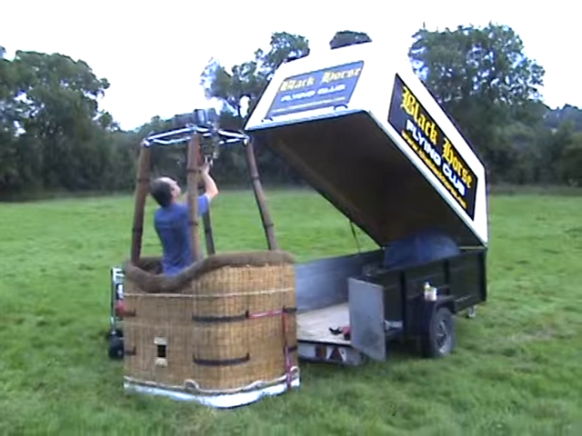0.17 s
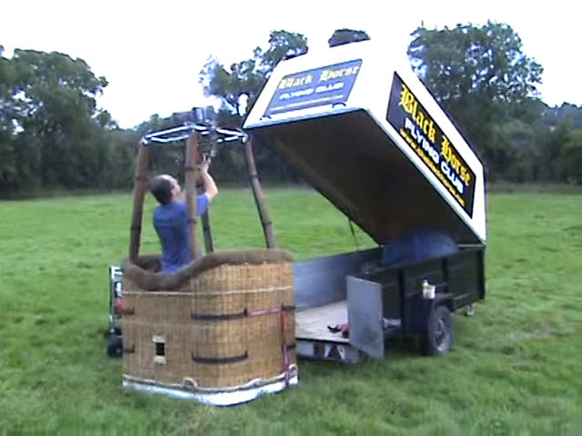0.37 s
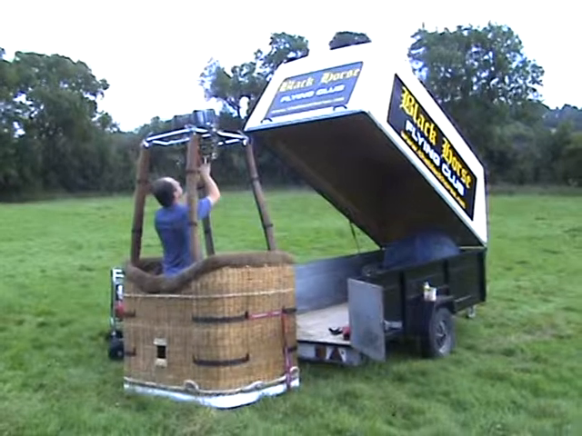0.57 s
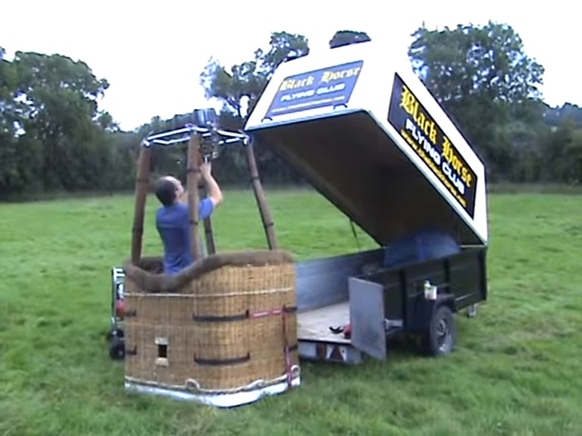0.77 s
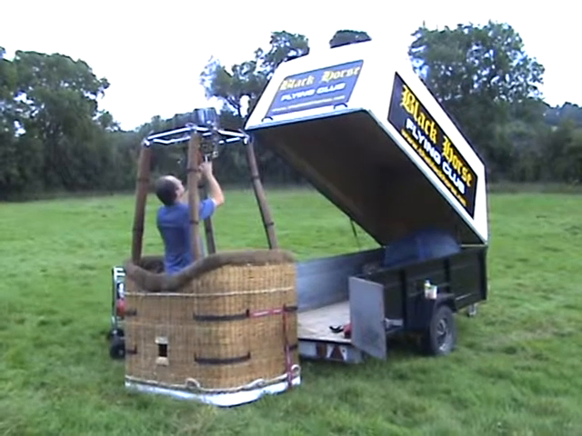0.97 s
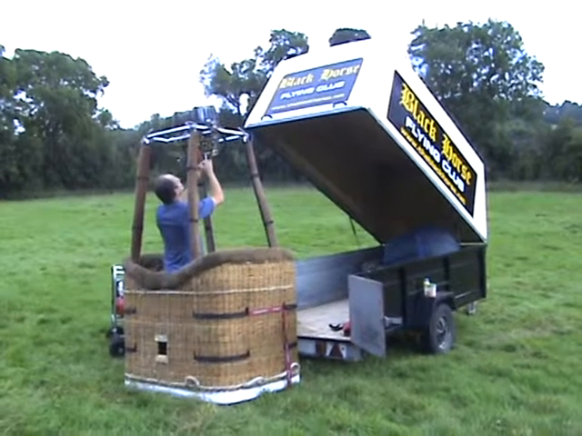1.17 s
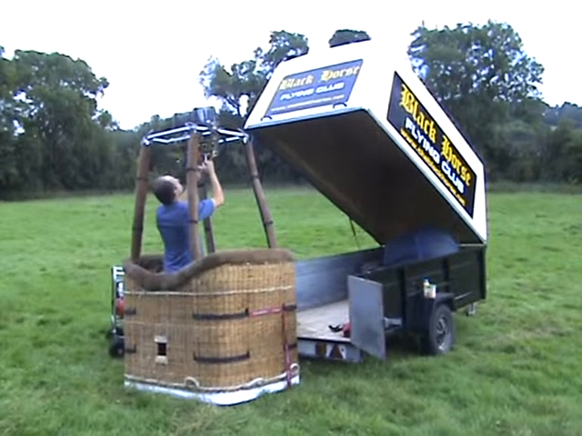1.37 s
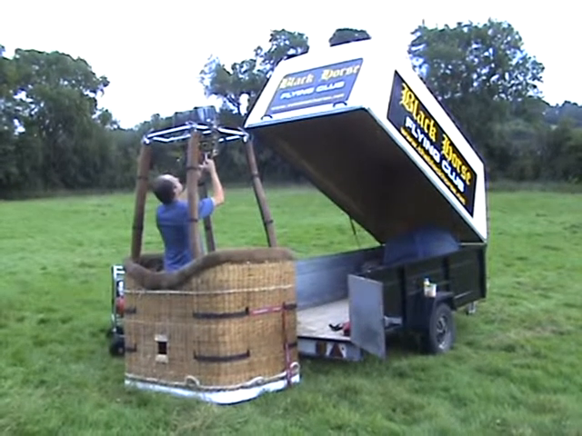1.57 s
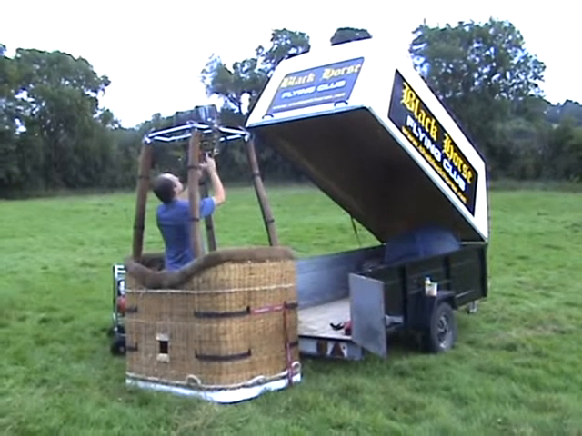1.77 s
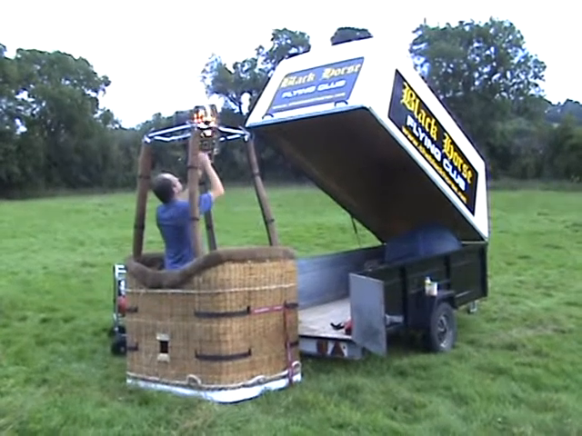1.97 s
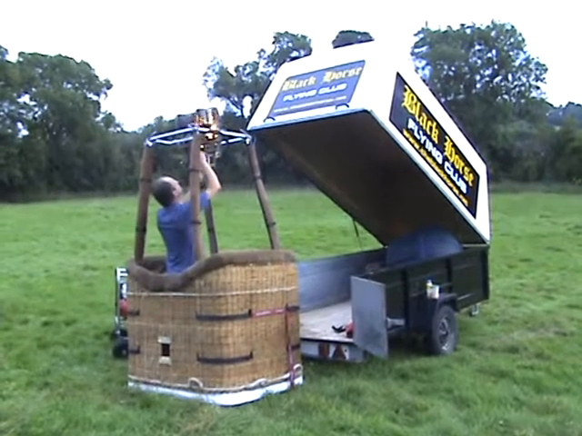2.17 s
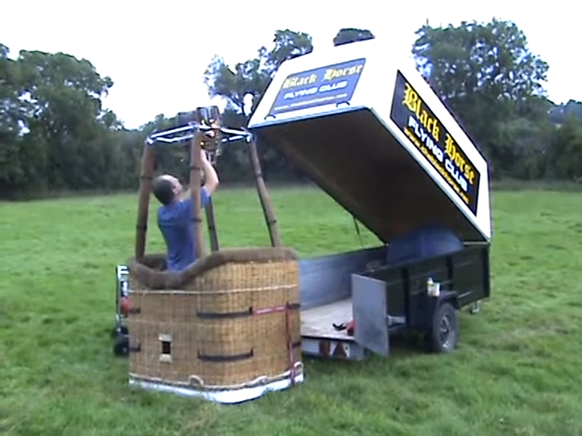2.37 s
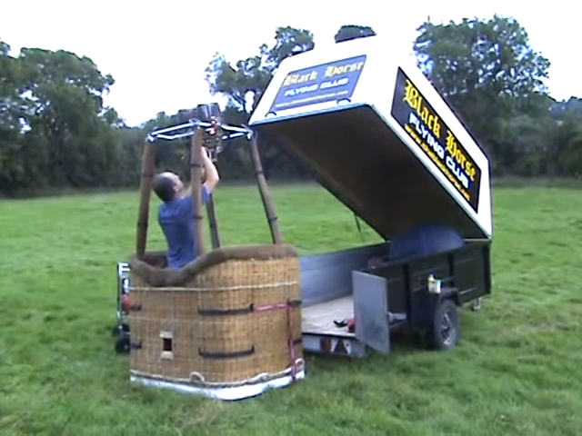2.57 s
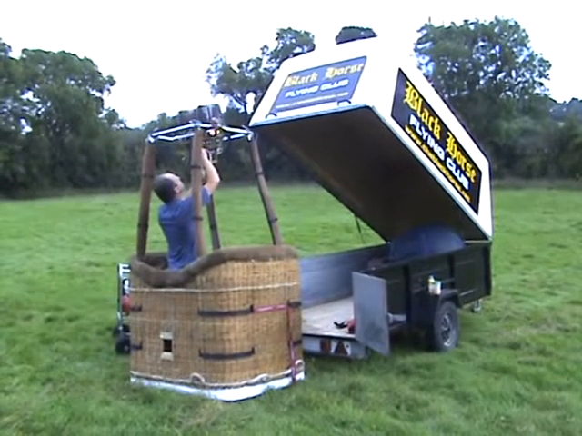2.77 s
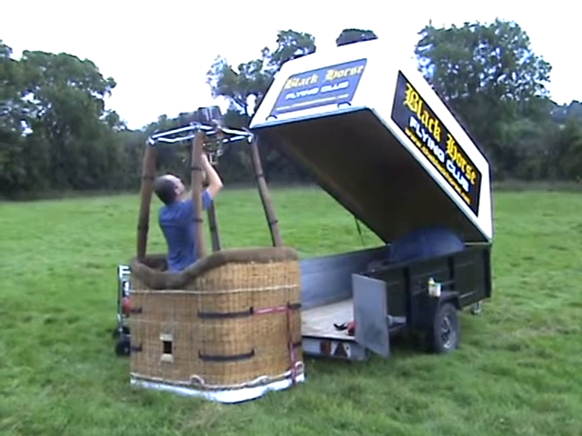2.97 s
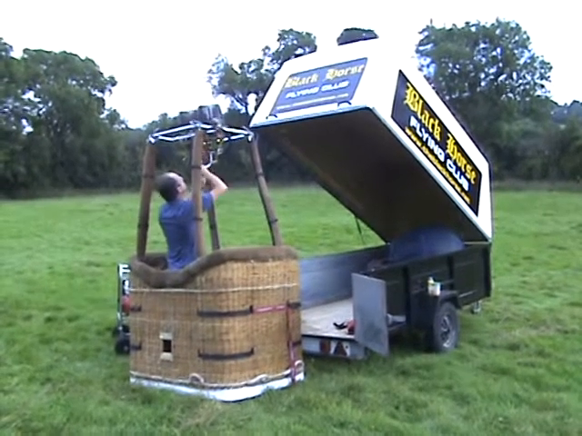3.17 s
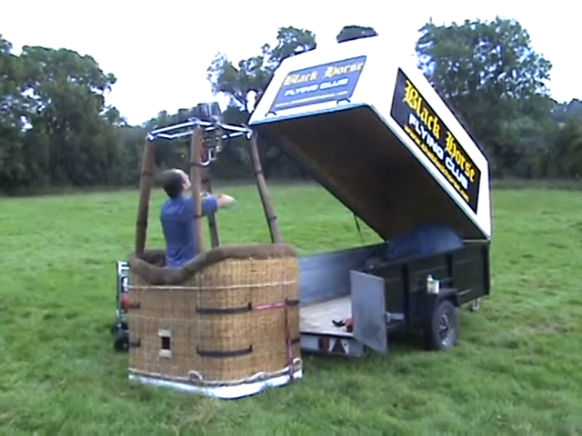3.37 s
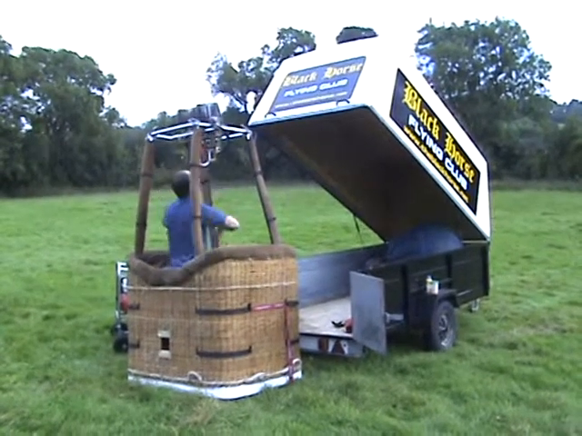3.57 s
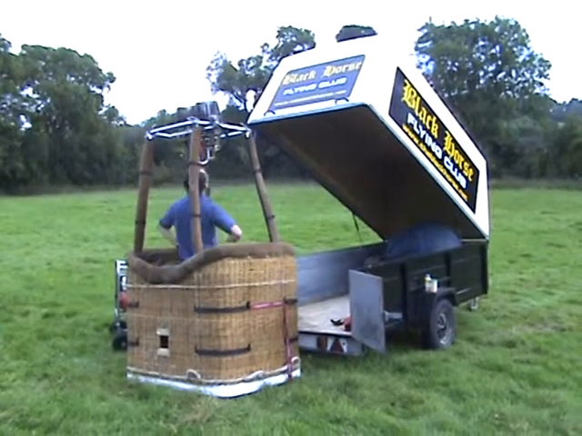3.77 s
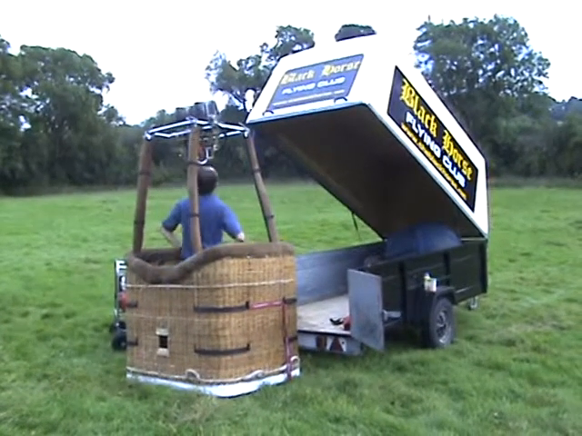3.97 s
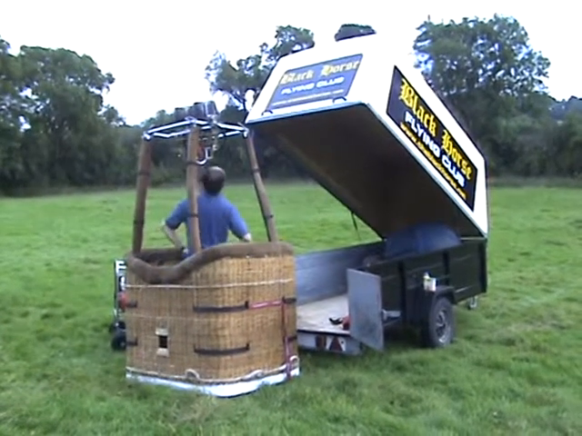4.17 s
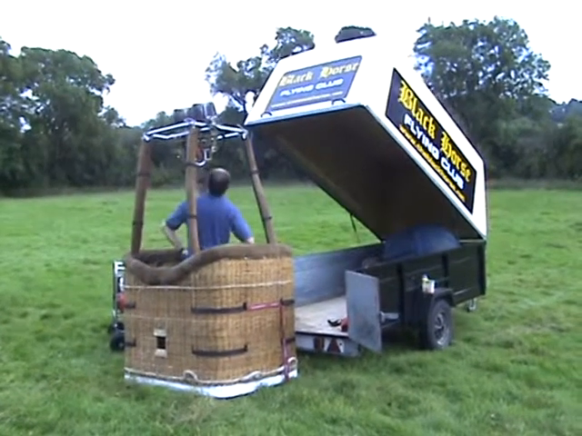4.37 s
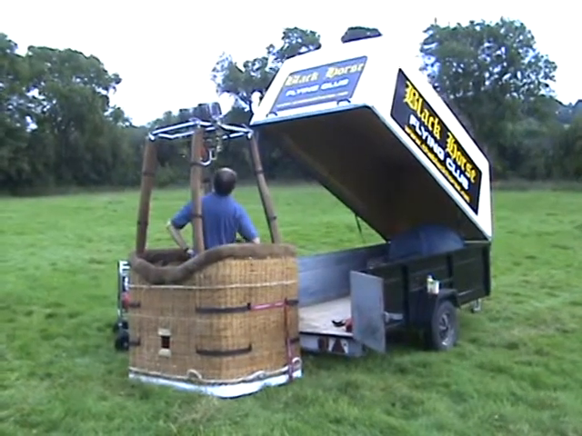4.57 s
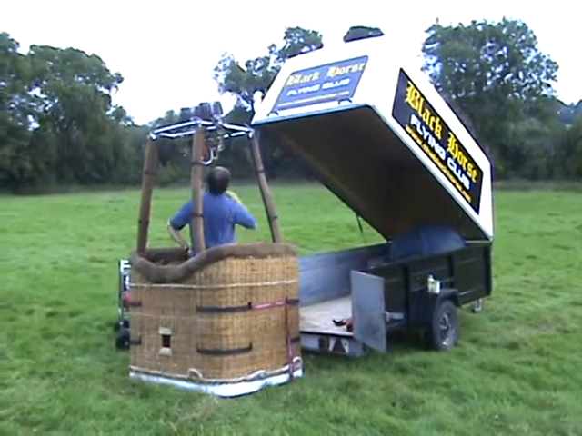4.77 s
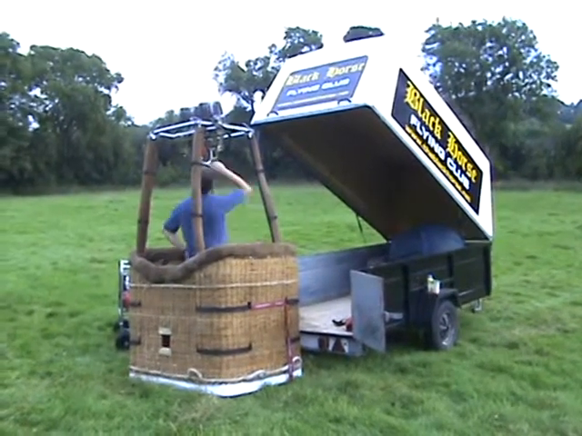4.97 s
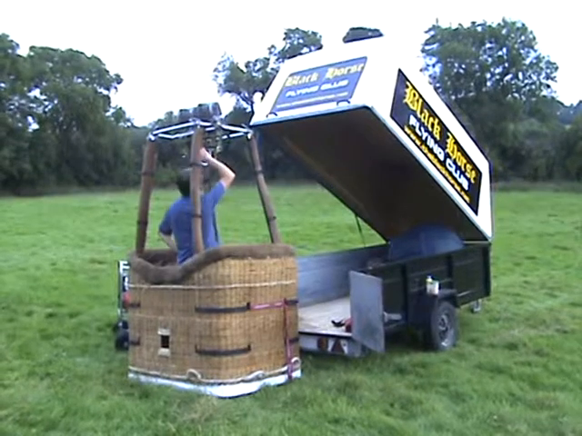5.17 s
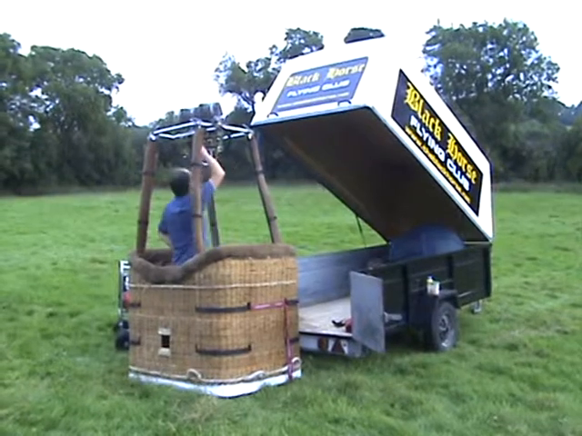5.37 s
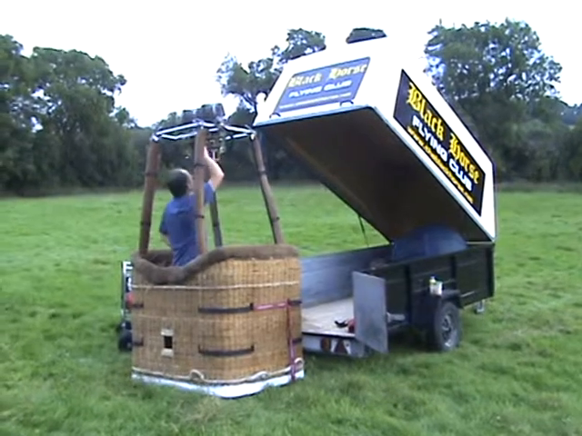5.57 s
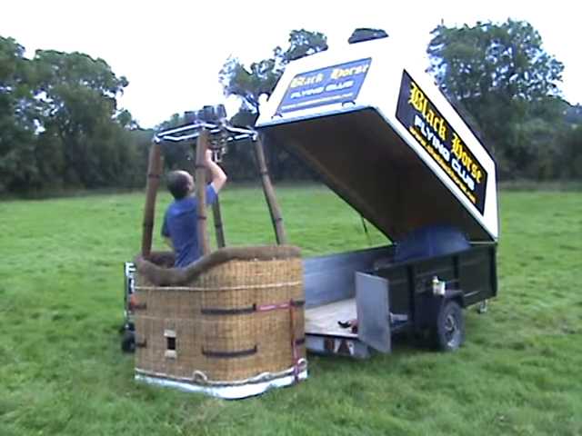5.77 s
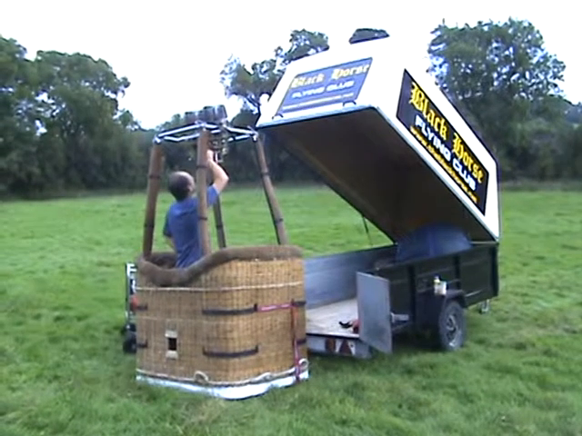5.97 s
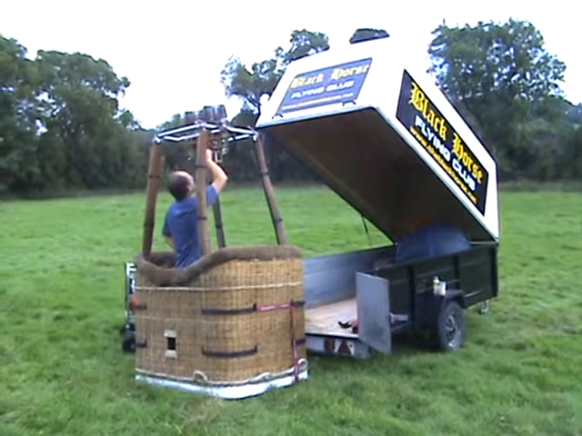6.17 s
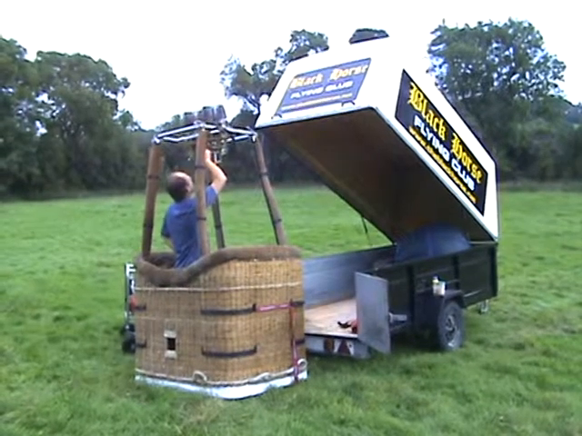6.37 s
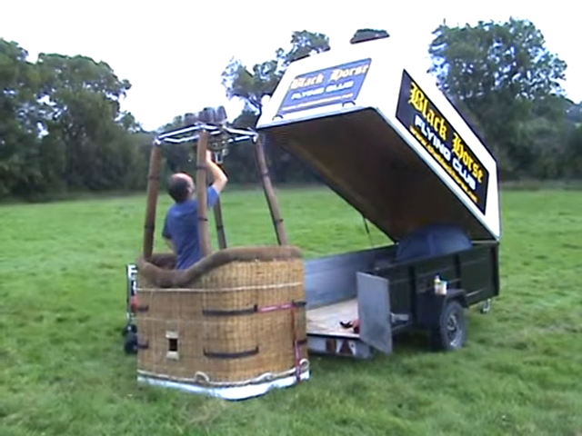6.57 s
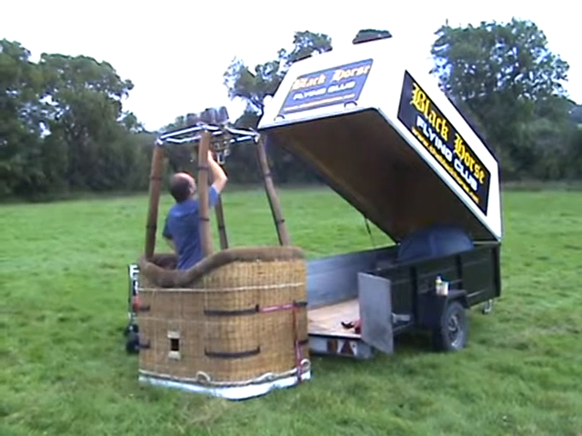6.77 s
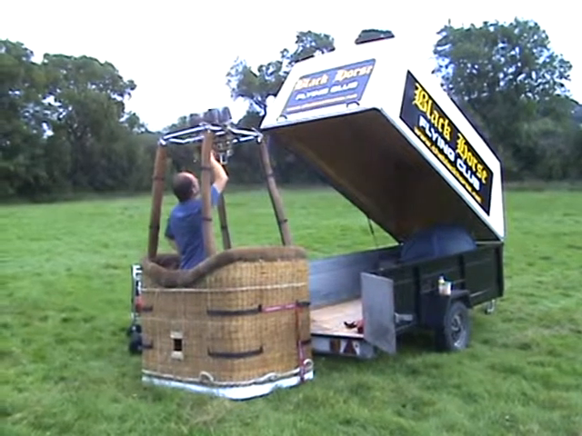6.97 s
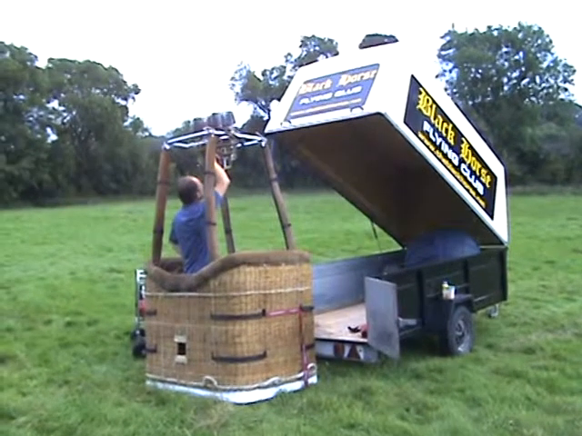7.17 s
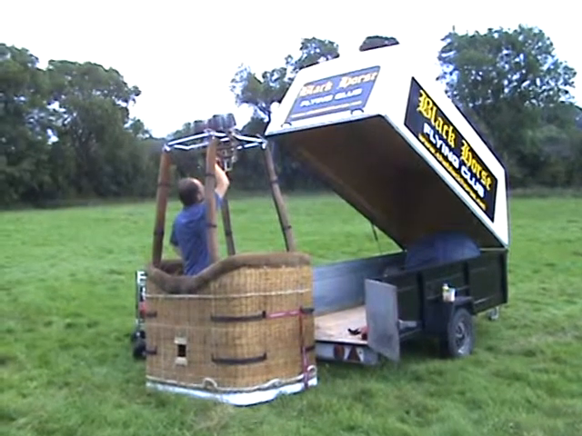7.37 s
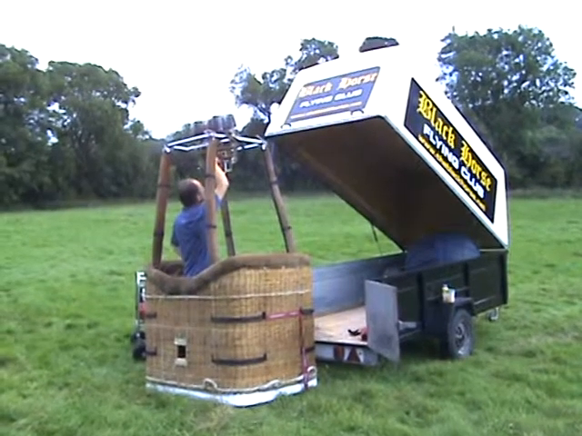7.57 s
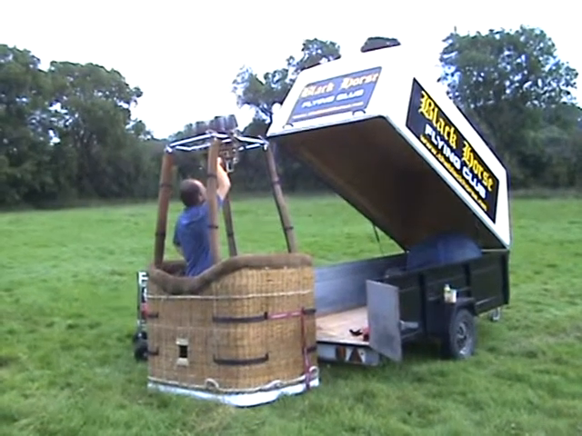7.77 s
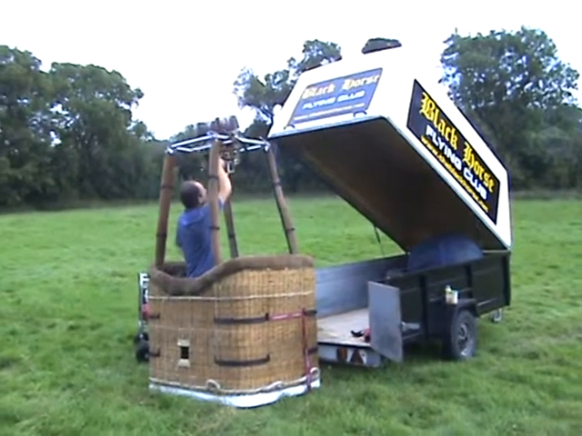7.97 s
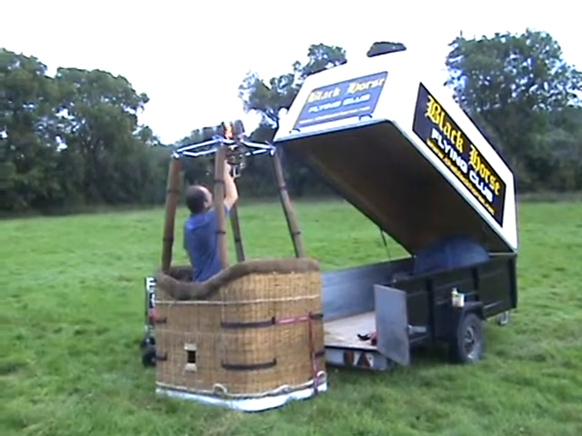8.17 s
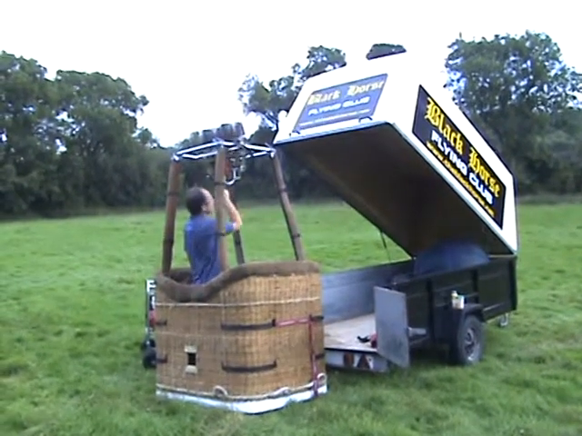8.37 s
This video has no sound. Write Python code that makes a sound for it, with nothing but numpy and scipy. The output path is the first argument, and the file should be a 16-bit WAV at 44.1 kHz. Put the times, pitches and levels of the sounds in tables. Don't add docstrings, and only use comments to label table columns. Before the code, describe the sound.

From a very quick fade-in at 0 s, a balloon burner blasts at full force: a dense low roar, a midrange rush of gas and a bright, sharp hiss with sizzle, nearly overloading the camera microphone. It weakens from about 1.6 s and is cut by 1.9 s. The pause is far quieter: distant traffic rumble and wash, a far car's soft tyre note sinking in pitch, and a thin whistling pilot hiss. A crisp metal tick comes at 3.76 s, with fainter ones near 4.3, 5.6 and 5.83 s. At about 5.97 s gas spits, then catches with a low thump and pop and a small crack. The second blast roars until about 7.9 s, deeper and less hissy, its sizzle sputtering in surges around 6.5, 7.4 and 7.9 s. It stops abruptly near 8 s, leaving faint road noise until 8.4 s. Open field, wide stereo, dry.

```python
import sys
import numpy as np
from scipy import signal
from scipy.fft import rfft, irfft, next_fast_len
from scipy.io import wavfile
from scipy.ndimage import uniform_filter1d

SR = 44100
rng = np.random.default_rng(int(sys.argv[2]) if len(sys.argv) > 2 else 0)


def waveform_to_disk(signal):
    frames = np.transpose(np.atleast_2d(signal))
    scaled = np.clip(frames, -1, 1) * 32767
    samples = np.round(scaled).astype(np.int16)
    wavfile.write(sys.argv[1], SR, samples)


def elevation(decibels):
    levels = np.asarray(decibels, float)
    return 10 ** (levels / 20)


N = 370881

# (time [s], flow [dB])
VALVE_FLOWS = [
    [(0.03, -39), (0.05, -2), (0.07, 0), (0.55, 0.5), (1.41, -1.5), (1.62, -6), (1.74, -12.5), (1.85, -33), (1.95, -52)],
    [(5.965, -40.5), (5.995, -21), (6.02, -7.5), (6.04, -5), (6.1, 0.5), (7.945, -0.5), (7.982, -15), (8.02, -27), (8.14, -35)],
]
# (catches [s], starves [s], roar [dB], dies [dB per s], cold start [dB])
FLAMES = [
    (0.04, 1.738, -11.5, 158, -0.6),
    (6.034, 7.91, -16.5, 191, -1.5),
]
# (rush [dB], hiss [dB], sizzle [dB])
JET_LEVELS = [(-20, -25, -31.5), (-25, -37.5, -44.5)]
# (rush [dB per dB], hiss [dB per dB], sizzle [dB per dB])
JET_FOLLOW = [(.62, 1.07, 1.15), (1.2, .95, 0.85)]
# (frequency [Hz], level [dB per Hz])
FLAME_COLOURS = [
    [(15, -53), (25, -30.5), (58, -8.5), (128, -14), (195, -3.5), (273, -1.5), (319, -3), (390, -20), (455, -10), (620, -6), (757, -17), (870, -15), (1000, -27.5), (1300, -51), (2200, -120)],
    [(15, -39.5), (25, -8.5), (69, -4.5), (123, -6.5), (231, 1), (295, 0), (384, -14), (515, -4.5), (629, -5.5), (734, -9.5), (1000, -17.5), (1300, -46), (2200, -120)],
]
# (frequency [Hz], width [Hz], lift [dB])
GROUND_ECHO = [(121, 13, -6), (102, 32, 3.5), (691, 39, 3.5), (784, 89, -3.5)]
# (frequency [Hz], level [dB per Hz])
GAS_COLOURS = [
    [(470, -21), (800, 5), (975, -6), (1100, -0.5), (1310, -3), (2270, -8), (2560, -7), (3450, -17), (6740, -15), (11200, -20), (15500, -28)],
    [(470, -29), (800, 3), (963, -4), (1060, -1.5), (1790, -4.5), (3330, -15.5), (4320, -12.5), (6340, -10.5), (8860, -23), (11800, -25.5), (15500, -34)],
]
# (frequency [Hz], width [Hz], lift [dB])
COIL_RINGING = [
    [(1100, 64, 5.5), (1780, 180, 4), (2032, 67, 7.5), (2566, 100, 6), (2760, 90, -1), (1320, 100, -2.5), (5000, 94, 2.5), (6860, 370, 2.5), (10900, 870, 2)],
    [(1720, 130, 1), (4360, 450, 3), (6250, 110, 2.5), (8270, 120, 5), (9380, 180, 2), (12050, 350, 3), (12650, 400, -3), (10620, 293, 2.5)],
]
# (peak [s], lift [dB], builds [s], clears [s])
SPITS = [(0.126, 2, 0.026, .02), (0.36, -0.5, 0.053, .06), (6.035, 11.5, 0.026, 0.032),
         (6.095, 8, 0.032, 0.086), (6.35, 4.5, .1, 0.097), (6.53, 7.5, 0.11, 0.083), (6.93, 2, .03, .05),
         (7.4, 8.5, 0.11, 0.065), (7.56, 2.5, 0.018, .03), (7.76, 4, .06, 0.064), (7.87, 8, .025, 0.038),
         (7.96, 7, 0.039, 0.0354)]
SPIT_SHARES = (.1, .15, .45, 1.01)
# (time [s], drop [dB], length [s])
STUTTERS = [(0.159, -2, 0.012), (0.256, -2, 0.025), (6.556, -7.5, 0.02), (7.52, -1.5, 0.017)]
STUTTER_SHARES = (0.38, 0.43, .9, .6)
# (time [s], strength [dB], ring [Hz], time to fall 60 dB [s], roughness [0-1])
IGNITION = [
    (5.974, -31, 7500, 0.2, 0.8),
    (6.11, -18, 2480, .004, 0.22),
    (6.040, -4, 165, .11, .1),
    (6.038, -9, 80, .2, .1),
]
# (time [s], strength [dB], ring [Hz], time to fall 60 dB [s], roughness [0-1])
METAL_TICKS = [(3.758, -26, 4120, .012, .15), (3.7566, -25, 2100, .015, .8), (3.7567, -42, 6600, .014, .9),
               (3.7754, -43, 7000, .009, .5), (3.7756, -41, 3800, .010, .7), (4.277, -42, 2760, .05, .3),
               (5.606, -39, 2850, .08, .1), (5.975, -35, 2700, .06, .2), (5.830, -51, 6900, .07, .15),
               (5.828, -53, 8600, .05, .9), (5.842, -50, 5300, .08, .3), (5.834, -35, 2550, .06, .1),
               (5.829, -62, 11900, .03, .1), (5.852, -54, 7400, .05, .8)]
# (time [s], note [Hz], level
# [dB])
CAR = [(1.9, 1100, -42), (2.7, 1080, -44.5), (3.3, 1000, -43.5), (3.75, 1020, -37), (4.0, 920, -41),
       (4.4, 860, -39.5), (5.3, 781, -40.5), (5.9, 750, -39.5), (8.1, 1080, -40.5)]
# (time [s], nearness [dB])
ROAD_NEARNESS = [(1.95, -4), (2.7, -2.5), (3.55, -2.5), (3.76, -1), (3.98, -1.6), (4.88, 0.2), (5.9, -0.6),
                 (8.1, -1), (8.41, -0.5)]
# (frequency [Hz], level [dB per Hz])
ROAD_COLOUR = [(15, -34), (25, -12), (61, -5.5), (84, 0), (136, -7), (274, -4.5), (388, -9), (551, -4.5),
               (969, -5), (1370, -8.5), (1950, -16.5), (3340, -38), (4370, -43.5), (8110, -58.5),
               (15500, -65)]
# (time [s], lift [dB], length [s])
ENGINES = [(1.98, -5, .12), (2.75, 3.5, .3), (3.76, 2.5, .12), (4.6, -1, .3), (5.1, -3.5, .1),
           (8.3, 6, .15)]
# (frequency [Hz], width [Hz], lift [dB])
BACKGROUND_PEAKS = [(80, 17, 6), (1080, 300, 0.5), (4400, 370, 3.5), (6250, 250, 6), (5300, 40, -7),
                    (6870, 44, 8)]
# (time [s], level [dB])
PILOT_HISS = [(1.95, -64.5), (3.0, -67), (4.5, -64), (5.55, -63), (5.8, -62), (8.1, -60.5), (8.41, -61.5)]
# (frequency [Hz], level [dB])
SIDE_NOISE = [(30, -14), (150, -20), (600, -20), (1500, -15), (4000, -10), (8000, -9), (13000, -13)]
# (frequency [Hz], left minus right [dB], left leads [radians])
STEREO_PORTS = [(30, -6.2, 0.26), (60, -5.7, 0.41), (120, -3.6, 0.75), (220, -1.6, 1.1), (400, 0.5, 1.51),
                (700, 4.1, 1.7), (1200, 6.0, 2.03), (2000, 7.1, 2.52), (3000, 5.7, 3.25), (4300, 3.5, 4.06),
                (6000, 1.7, 4.83), (8000, 1.3, 5.38), (11000, 0.5, 5.96), (15000, 0.3, 6.22)]


def blast(flow, jets_db, follow, fire, flame_colour, gas_colour, coil):
    s, flow_db = np.transpose(flow)
    count = round(2.3 * SR)
    t = s[0] + np.arange(count) / SR
    flame, gas = lifted(flame_colour, GROUND_ECHO), lifted(gas_colour, coil)
    roar = turbulence(count, flame, 15, 880, 150, 800, patchy_db=0.3, flicker_db=0.5, size=4096)
    rush = turbulence(count, gas, 894, 3360, 1000, 3000, patchy_db=0.0, flicker_db=-0.4)
    hiss = turbulence(count, gas, 3480, 6700, 4430, 8000, patchy_db=-0.5, flicker_db=-0.05)
    sizzle = turbulence(count, gas, 9080, 19000, 10460, 15000, patchy_db=-1.1, flicker_db=1.3)

    open_db = np.interp(t, s, flow_db)
    levels = [burning(t, *fire)]
    for db, share in zip(jets_db, follow):
        levels.append(elevation(db + share * open_db))
    spit_db = np.outer(SPIT_SHARES, bumps(t, SPITS))
    stutter_db = np.outer(STUTTER_SHARES, bumps(t, STUTTERS))
    layers = levels * elevation(spit_db + stutter_db) * [roar, rush, hiss, sizzle]
    edges = np.clip(np.minimum((t - s[0]) / 0.01, (s[-1] - t) / 0.1), 0, 1)
    return s[0], edges * layers.sum(0)


def burning(t, catches, starves, roar_db, dies_db, cold_db):
    catch_s, warm_s = 0.0073, 0.28
    since = np.maximum(t - catches, 0)
    warming_db = cold_db * np.exp(-(since / warm_s) ** 2)
    dying_db = dies_db * np.maximum(t - starves, 0)
    return elevation(roar_db + warming_db - dying_db) * np.minimum(since / catch_s, 1) ** 2


def ring(s, db, hz, t60, rough):
    t = np.arange(4000) / SR
    band = signal.butter(3, [hz * 0.6, hz * 1.25], "band", fs=SR)
    puff = signal.lfilter(*band, rng.standard_normal(len(t)))
    tone = np.sin(2 * np.pi * hz * t)
    body = (1 - rough) * tone + rough * puff / puff.std()
    rise = (1 - np.exp(-t / (0.07 * t60))) ** 2
    return s, elevation(db - 60 * t / t60) * rise * body


def car():
    s, hz, db = np.transpose(CAR)
    width_hz = 305
    t, r = np.arange(N) / SR, np.exp(-np.pi * width_hz / SR)
    soft = signal.lfilter([1], [1, -2 * r, r * r], rng.standard_normal((2, N)))
    turn = 2 * np.pi * np.cumsum(np.interp(t, s, hz)) / SR
    band = soft[0] * np.cos(turn) + soft[1] * np.sin(turn)
    return elevation(np.interp(t, s, db)) * band / band.std()


def road():
    t, colour = np.arange(N) / SR, lifted(ROAD_COLOUR, BACKGROUND_PEAKS)
    rumble = turbulence(N, colour, 15, 140, 30, 130, patchy_db=0.5, flicker_db=0.2, size=4096)
    drone = turbulence(N, colour, 98, 950, 450, 800, patchy_db=0.7, flicker_db=0.2)
    wash = turbulence(N, colour, 790, 3300, 1200, 2500, patchy_db=0.5, flicker_db=0.7)
    near_db = np.interp(t, *np.transpose(ROAD_NEARNESS))
    rumble *= elevation(-41.5 + 0.88 * near_db + bumps(t, ENGINES))
    drone *= elevation(-39.5 + 1.7 * near_db)
    wash *= elevation(-37 + 1.06 * near_db)
    return rumble + drone + wash


def pilot():
    colour = lifted(ROAD_COLOUR, BACKGROUND_PEAKS)
    hiss = turbulence(N, colour, 3300, 19000, 3240, 8000, patchy_db=0.2, flicker_db=-1.0)
    return elevation(np.interp(np.arange(N) / SR, *np.transpose(PILOT_HISS))) * hiss


def side_noise(x):
    hz, _, z = signal.stft(x, SR, nperseg=256)
    shuffle = rng.standard_normal((2, *z.shape)) + 1j * rng.standard_normal((2, *z.shape))
    strength = elevation(read(SIDE_NOISE, hz)[0])[:, None]
    return signal.istft(z * shuffle * strength, SR, nperseg=256)[1][:, :N]


def turbulence(count, colour, lo, hi, level_lo, level_hi, patchy_db, flicker_db, size=1024):
    frames, hz = count // (size // 4) + 5, np.fft.rfftfreq(size, 1 / SR)
    z = rng.standard_normal((frames, len(hz))) + 1j * rng.standard_normal((frames, len(hz)))
    edges = np.sqrt((1 + (lo / (hz + 1)) ** 8) * (1 + (hz / hi) ** 8))
    shape = elevation(colour(hz)) / edges
    in_band = (hz >= level_lo) & (hz < level_hi)
    shape /= np.sqrt(np.sum(shape[in_band] ** 2))
    patches = patchy_db * wander(z.shape, size=(10, 12))
    flicker = flicker_db * wander(z.shape, size=(2, 80))
    z = (z * elevation(patches + flicker)).T * shape[:, None]
    x = signal.istft(z, nperseg=size, noverlap=size * 3 // 4)[1][:count]
    return x / x.std() * np.linalg.norm(shape)


def wander(shape, size):
    x = uniform_filter1d(rng.standard_normal(shape), size[0], 0)
    x = uniform_filter1d(x, size[1], 1)
    return x / x.std()


def lifted(points, peaks):
    def colour(hz):
        lifts = [db / (1 + (2 * (hz - f) / width) ** 2) for f, width, db in peaks]
        return read(points, hz)[0] + sum(lifts)
    return colour


def read(points, hz):
    f, *values = np.transpose(points)
    return [np.interp(np.log(hz + 1), np.log(f + 1), v) for v in values]


def bumps(t, rows):
    total = 0
    for s, db, *widths in rows:
        width = np.where(t < s, widths[0], widths[-1])
        total = total + db * np.exp(-((t - s) / width) ** 2)
    return total


def add(mix, s, sound):
    part = mix[round(s * SR):][:len(sound)]
    part += sound[:len(part)]


def scene():
    mix = road() + pilot() + car()
    for parts in zip(VALVE_FLOWS, JET_LEVELS, JET_FOLLOW, FLAMES, FLAME_COLOURS, GAS_COLOURS, COIL_RINGING):
        add(mix, *blast(*parts))
    for row in METAL_TICKS + IGNITION:
        add(mix, *ring(*row))
    return mix + side_noise(mix)


def band_limit(x):
    return signal.sosfilt(signal.butter(12, 15620, fs=SR, output="sos"), x)


def record(dry):
    power_db = 10 * np.log10(abs(uniform_filter1d((dry ** 2).mean(0), size=500)) + 1e-12)
    over_db = uniform_filter1d(np.maximum(power_db + 15, 0), size=300)
    evened = dry / elevation(0.26 * over_db)

    size = next_fast_len(N + 4096)
    evened = np.pad(evened, ((0, 0), (0, size - N)), "reflect")
    hz = np.fft.rfftfreq(size, 1 / SR)
    balance_db, lead = read(STEREO_PORTS, hz)
    ratio = elevation(balance_db) * np.exp(1j * lead)
    ports = 2 / (1 + ratio) * np.array([ratio, ratio ** 0])
    ports = ports / np.sqrt(1 + (hz / 15600) ** 40)
    pair = irfft(rfft(evened, size) * ports, size)[:, :N]

    knee = 12.0
    clipped = pair / (1 + abs(pair / 1.05) ** knee) ** (1 / knee)
    start_s, fade_s = 0.043, 0.024
    fade = np.sin(np.pi / 2 * np.clip((np.arange(N) / SR - start_s) / fade_s, 0, 1)) ** 2
    return band_limit(np.clip(clipped, -1, 1) * fade)


dry = scene()
out = record(dry)
waveform_to_disk(out)
```